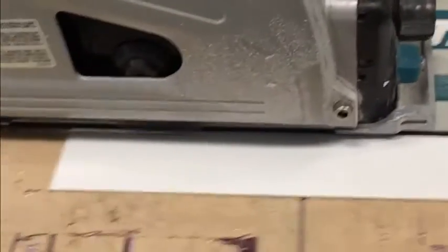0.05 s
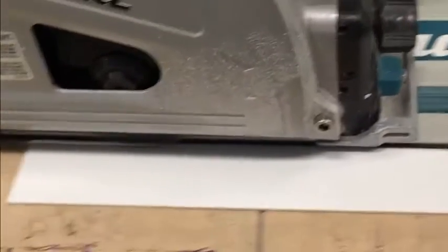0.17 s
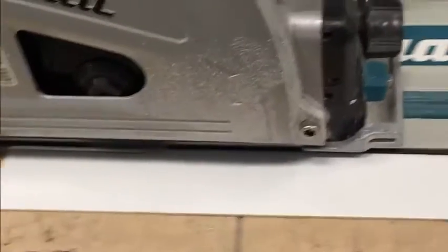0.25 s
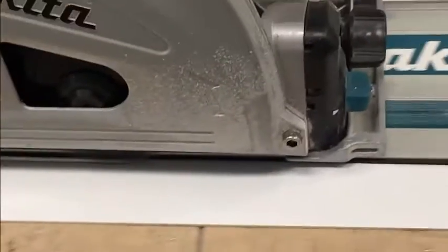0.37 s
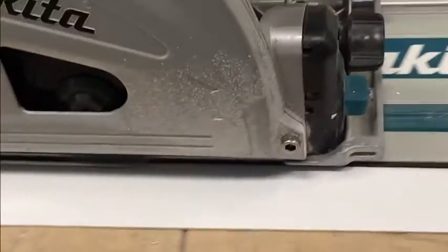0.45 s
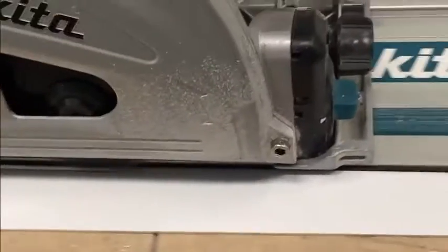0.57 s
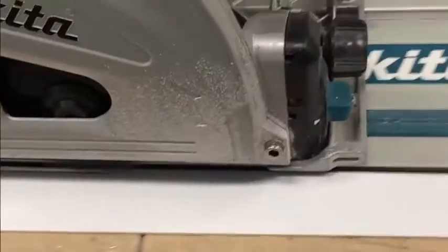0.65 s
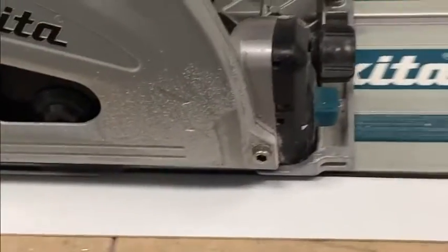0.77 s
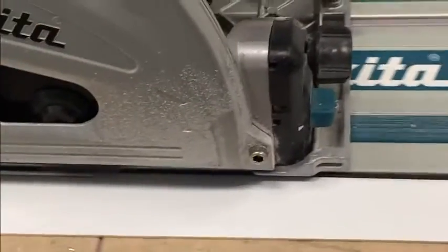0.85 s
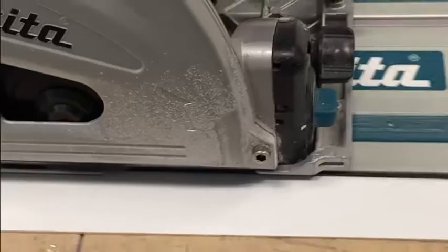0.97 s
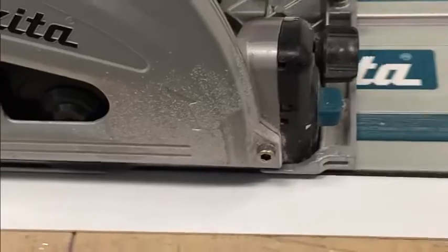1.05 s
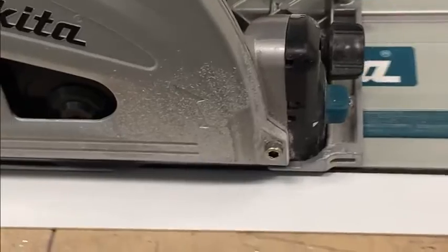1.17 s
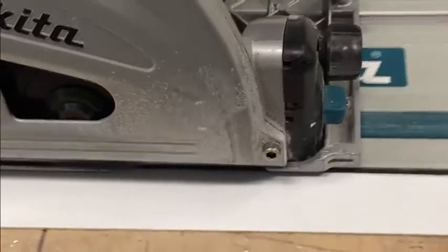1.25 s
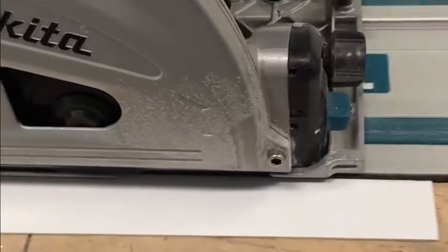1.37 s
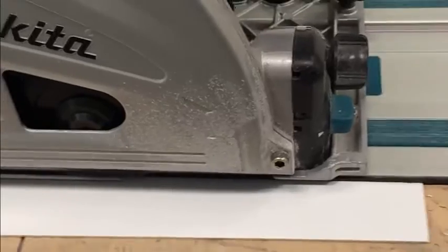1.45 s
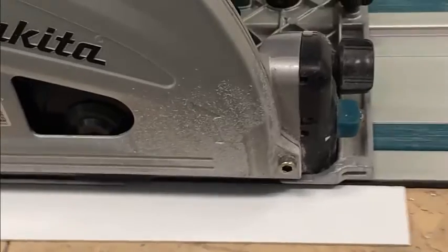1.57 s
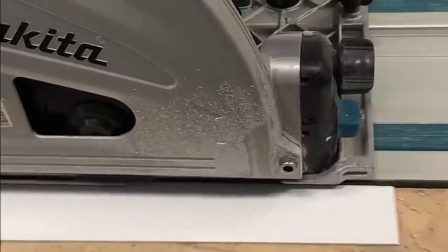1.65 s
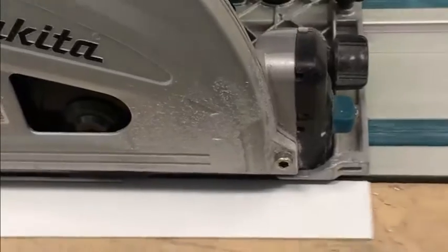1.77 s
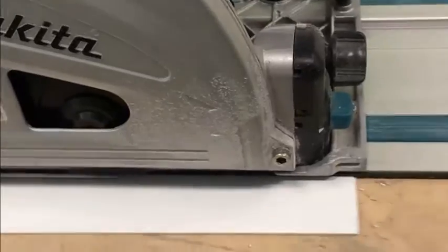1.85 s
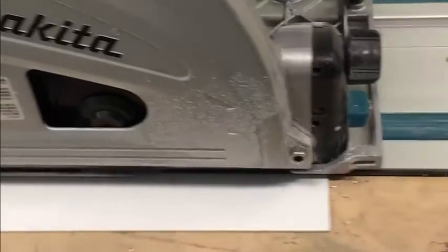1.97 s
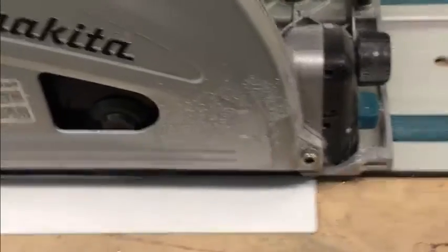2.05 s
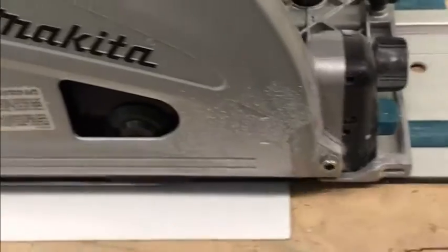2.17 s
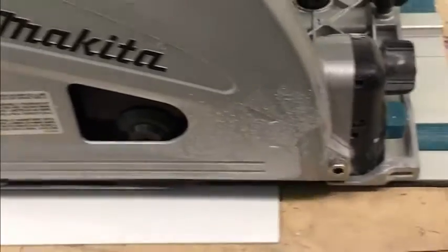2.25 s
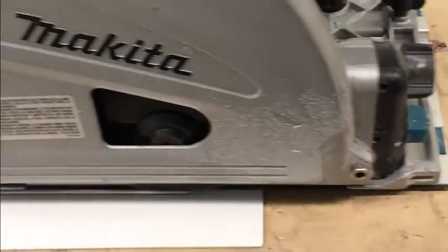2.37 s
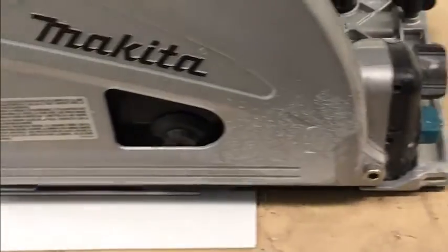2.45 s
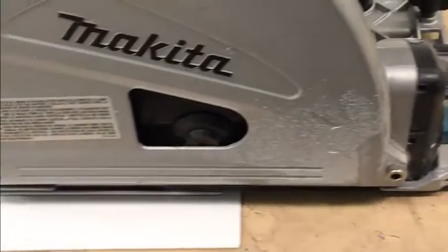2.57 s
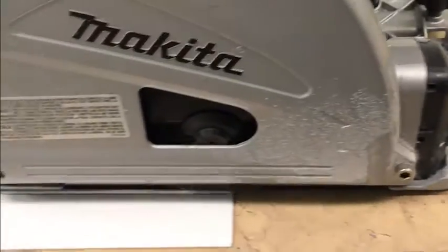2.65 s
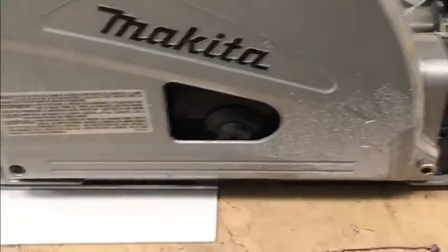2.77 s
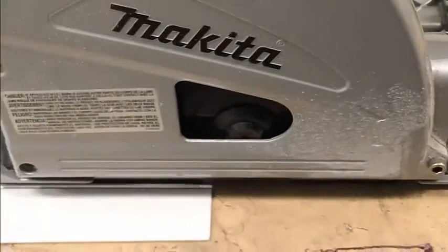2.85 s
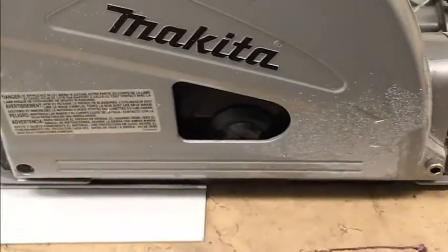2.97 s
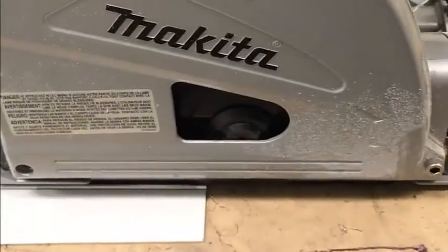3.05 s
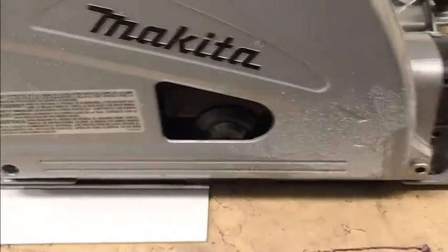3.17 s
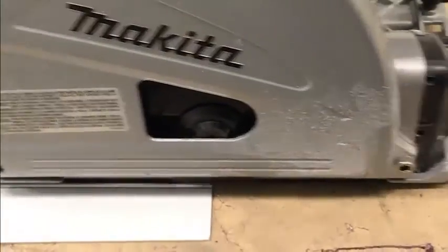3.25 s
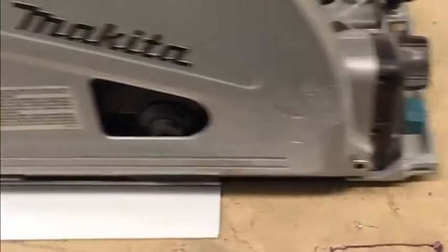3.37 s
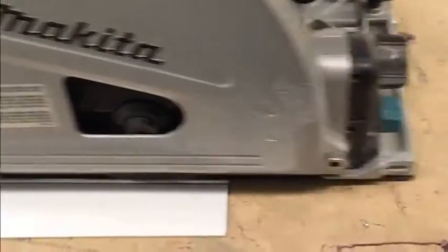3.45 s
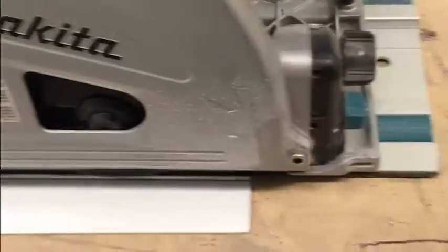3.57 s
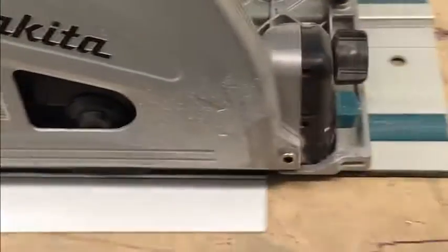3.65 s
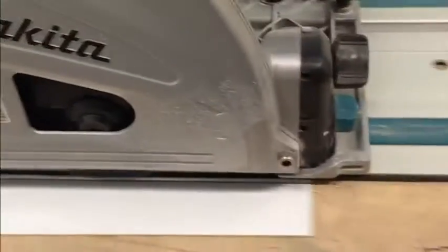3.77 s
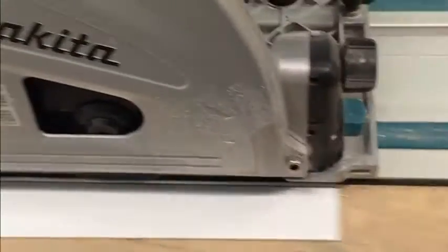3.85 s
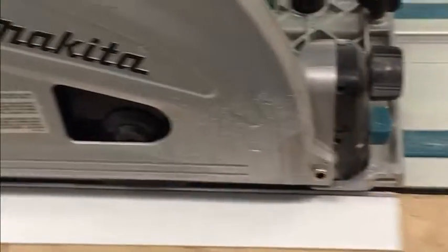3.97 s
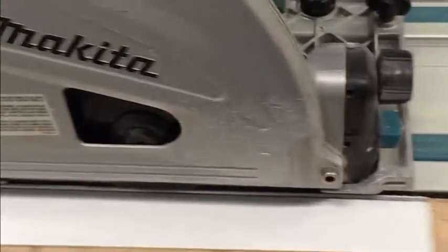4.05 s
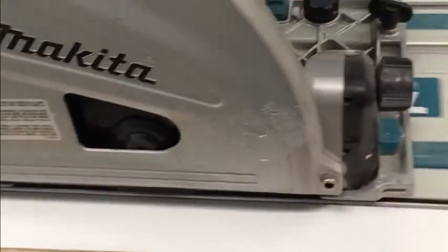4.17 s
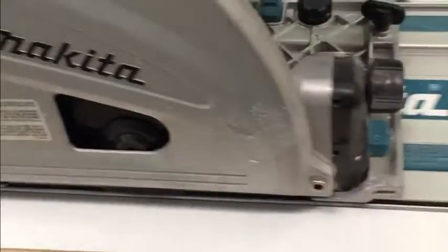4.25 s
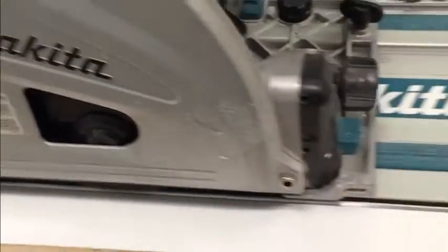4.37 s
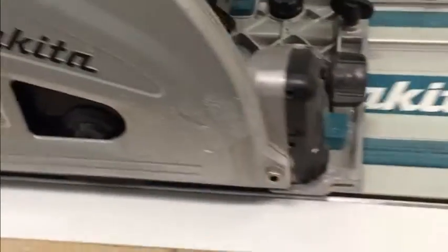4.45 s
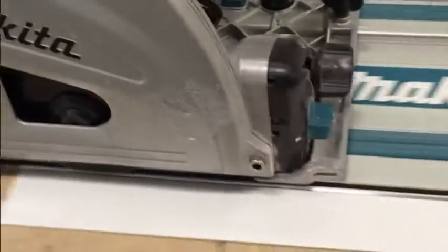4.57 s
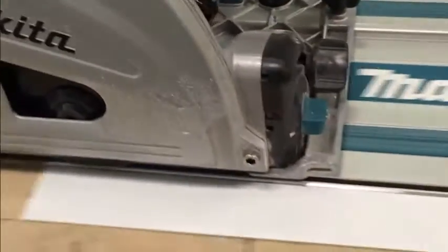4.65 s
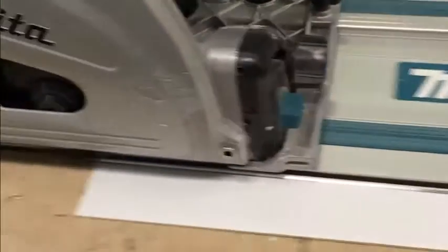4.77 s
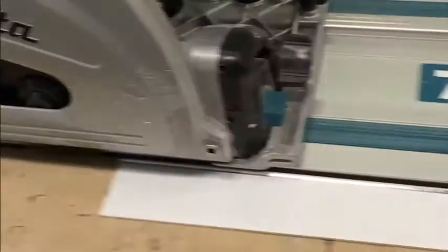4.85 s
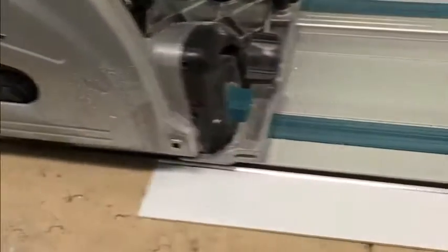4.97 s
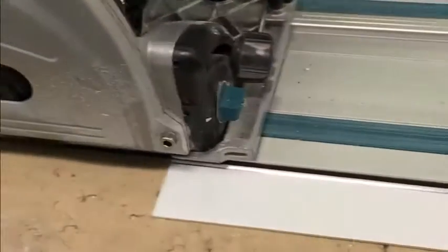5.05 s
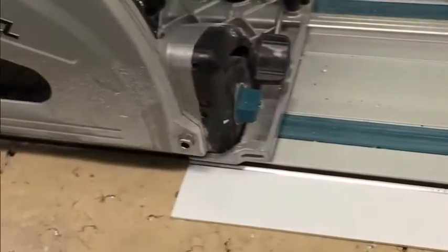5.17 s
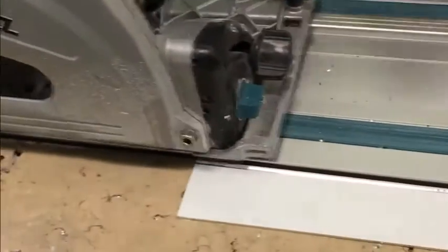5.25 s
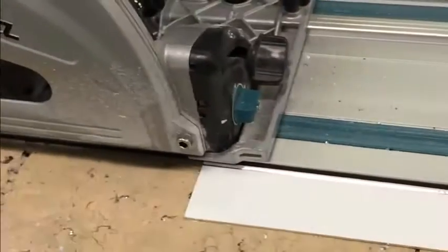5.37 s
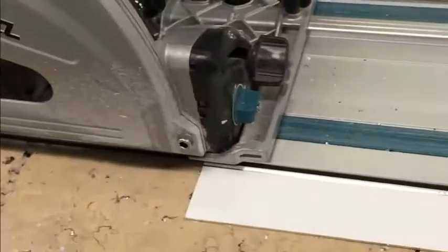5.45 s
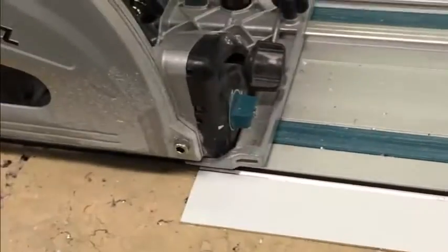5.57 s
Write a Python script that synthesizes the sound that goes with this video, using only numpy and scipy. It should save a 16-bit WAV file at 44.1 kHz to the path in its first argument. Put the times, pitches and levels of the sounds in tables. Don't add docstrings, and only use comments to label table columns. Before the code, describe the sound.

From the start a track saw is already cutting thin aluminium, very close: a loud, coarse buzz at about 88 pulses a second, with metallic ringing mostly around 1 to 2 kHz and gritty chip rasp. Its colour and pressure waver as it travels. Underneath lie a broad fan roar, a thin high motor whine and low table rumble. At about 2.7 s the cut ends abruptly, leaving roar and faint blade rubbing. From 3.3 to 3.8 s a long return stroke buzzes again, with a thin tooth-rate singing; shorter, quieter, scrapier jerks follow at 4.1, 4.4 and 4.55 s, ending near 4.8 s. At about 5.1 s the trigger is released and the whine glides down while air noise continues. A knock at 5.24 s leads into a strong double clack at 5.28 s, then faint rattles and a small double lever knock at 5.6 s. The workshop reverberation is short.

```python
import sys
import numpy as np
from scipy import signal
from scipy.io import wavfile
from scipy.ndimage import uniform_filter1d

SR = 44100
rng = np.random.default_rng(int(sys.argv[2]) if len(sys.argv) > 2 else 0)


def makeup_ratio(level_db):
    decades = np.asarray(level_db, float) / 20
    return 10 ** decades


def file_out(sig):
    cols = np.atleast_2d(sig).T
    lim = np.clip(cols, -1, 1)
    pcm = np.round(lim * 32767).astype(np.int16)
    wavfile.write(sys.argv[1], SR, pcm)


N = 247842
TIME = np.arange(N) / SR
RELEASE_S = 5.08
BACK_FROM_S, BACK_TO_S = 3.3, 4.82
GEARING = 4.877


def evened(x):
    return x / np.sqrt(np.mean(x ** 2) + 1e-20)


def eased(condition, samples):
    return uniform_filter1d(1. * condition, size=samples)


def curves(rows):
    s, *columns = np.transpose(rows)
    return [np.interp(TIME, s, c) for c in columns]


def wander(hz):
    t = TIME[::64]
    x = sum(np.sin(2 * np.pi * (f * t + rng.random())) / np.sqrt(f) for f in np.geomspace(hz / 10, hz, num=12))
    return np.interp(TIME, t, evened(x))


def highpass(x, hz):
    return signal.sosfilt(signal.butter(1, hz, "high", fs=SR, output="sos"), x)


# start_s, speed_turns_per_s
SPEED = [(0, 88.4), (.4, 88.7), (1.85, 88.7), (1.95, 88.45), (2.75, 88.4), (3.3, 88.8), (5.07, 88.9)]


def blade_speed():
    coasting_s = np.maximum(TIME - RELEASE_S, 0)
    return curves(SPEED)[0] - 40.5 * coasting_s + 2.5 * coasting_s ** 2


# start_s, end_s, let_go_s, level_db, blade_plate_db
STROKES = [
    (-.1, 2.722, .045, -11.7, -11),
    (3.265, 3.81, .15, -12, -8),
    (4.08, 4.3, .07, -17.5, -1.5),
    (4.36, 4.49, .04, -17.5, -4.5),
    (4.535, 4.765, .028, -16, -3.5),
]
# start_s, level_db
RUB = [(2.8, -29), (3.25, -25.5), (4., -23), (4.8, -23.5), (5., -31), (5.2, -38)]
# start_s, level_db
FEED = [(0, 2.5), (.25, -2.5), (.42, -0.4), (.6, -3.5), (.8, -0.5), (1.25, -1), (1.65, -0.2), (1.79, -2),
        (1.9, 1.), (2.55, 0.4), (2.7, 1.5), (3.3, -2.7), (3.45, 1.2), (3.8, -0.9), (4.1, 0.7)]


def strokes():
    rise_s, rub_plate_only_db, groove_plate_db = 0.053, -7, 4.5
    plate_feed = 0.33
    (rub_db,), (feed_db,) = curves(RUB), curves(FEED)
    in_groove = eased((TIME > BACK_FROM_S) & (TIME < BACK_TO_S), 1500)
    rub_plate_db = rub_plate_only_db + groove_plate_db * in_groove
    level_db, plate_db = rub_db, rub_plate_db
    for start, end, let_go, db, plate in STROKES:
        contact = np.clip(np.minimum((TIME - start) / rise_s, 1 + (end - TIME) / let_go), 0, 1)
        level_db = level_db + contact * (db + feed_db - rub_db)
        plate_db = plate_db + contact * (plate - plate_feed * feed_db - rub_plate_db)
    return level_db, plate_db


def teeth(turns, bite):
    strikes = np.zeros(N)
    for lag_turns, db in [(0, 0), (.17, -9), (.29, -14), (.5, -18)]:
        place = turns - lag_turns - 0.016 * wander(hz=1.5) * (lag_turns > 0)
        near = (place + .5) % 1 - .5
        sizes = makeup_ratio(db + .7 * rng.standard_normal(600))
        size = sizes[np.floor(place + 1.5).astype(int)]
        strikes += size * np.exp(-(near / .0018) ** 2)
    chips = (.5 + 0.62 * np.exp(-(turns % 1) / 0.9)) * rng.standard_normal(N)
    return np.sqrt(bite) * evened(strikes - strikes.mean()) + np.sqrt(1 - bite) * evened(chips)


def ring(force, modes, drift_db, late_s, centre_hz=None, reach_hz=200):
    out = np.zeros(N)
    for k, (hz, width, db) in enumerate(modes):
        r = np.exp(-np.pi * width / SR)
        mode = signal.lfilter([1 - r], [1, -r * np.exp(2j * np.pi * hz / SR)], force)
        lag = .8 * k + .05 * k ** 2 + rng.uniform(0, .6)
        off = 0 if centre_hz is None else np.minimum(((hz - centre_hz) / reach_hz) ** 2, 1.6)
        gain = makeup_ratio(db - 6 * off + drift_db * wander(hz=2.5))
        out += gain * (mode * np.exp(-1j * lag)).real
    out = np.roll(out, int(late_s * SR))
    return out / np.sqrt(uniform_filter1d(out ** 2, size=8000) + 1e-12)


def grit(turns):
    swell = 2.3 + np.exp(-((turns - .03) % 1) / 1.3)
    band = signal.butter(2, [2700, 5600], "band", fs=SR, output="sos")
    return evened(swell * signal.sosfilt(band, rng.standard_normal(N)))


def groove_brush(turns):
    brushing = eased((TIME > BACK_FROM_S) & (TIME < BACK_TO_S), 2000)
    gain = np.sqrt(2) * makeup_ratio(-31.5 + 1.5 * wander(hz=14)) * brushing
    return gain * np.cos(2 * np.pi * 48 * turns)


# pitch_hz, width_hz, level_db
BOTTOM_PATCH = [(91, 44, -25), (185, 26, 2.5), (357, 56, 1), (421, 25, 4), (535, 71, 1.5), (600, 53, -1.5),
                (706, 35, 2.5), (844, 76, 9.5), (886, 52, 2)]
LOW_PATCH = [(944, 110, 1.5), (1056.7, 39, 4.5), (1148, 25.5, 4), (1243, 47, -0.5)]
MIDDLE_PATCH = [(1240, 21, -8.5), (1434, 34, 6), (1562, 47, -5), (1630, 67, 1), (1708, 25, 3),
                (1760, 84, -2.5), (1884, 38, 0.5)]
HIGH_PATCH = [(1945, 69, -3.5), (2044, 24, 3.5), (2153, 100, -10), (2199, 59, 1.5), (2420, 28, -5.5),
              (2770, 110, -19)]
PLATE = [(2490, 60, 0), (2660, 70, 0), (3020, 80, -2), (3190, 70, -3), (3280, 80, -3), (3520, 110, -3),
         (3720, 110, -3), (4080, 80, -2), (4450, 100, -2), (4700, 50, -2), (4790, 60, 0), (5290, 120, -4),
         (5800, 300, -8), (7200, 300, -10), (8520, 150, -11)]
SPOT_HZ = 770, 1128, 1525, 2050
# start_s, high_over_low_db, upper_patch_slide_hz, lower_patch_slide_hz
SPAN = [(0, -5, -60, 10), (.2, 5, 90, -20), (.4, -3, 70, -17), (.55, -4, -68, -82), (.8, -6, -40, -52),
        (1.1, -6, 63, 15), (1.33, -4.5, -58, 55), (1.7, 0, -150, 60), (1.92, 3.5, -30, 37),
        (2.05, 3.5, 0, -6), (2.4, 1, -42, 48), (2.6, -4, 24, 29), (2.75, 3, 74, 0), (3.35, 0.5, 73, -30),
        (3.8, 7, 40, -31), (4.08, -2, -94, -30), (4.4, -4.5, 75, -28), (4.75, 3.5, 20, 86)]


def cut(speed, turns):
    (level_db, plate_db), (tilt_db, upper_hz, lower_hz) = strokes(), curves(SPAN)
    back = eased(TIME > BACK_FROM_S, 4000)
    bite = np.clip(0.1 * (uniform_filter1d(level_db, size=2000) + 25), .02, .8)
    bite *= np.where(TIME > STROKES[2][0], .72, 1)
    force = highpass(teeth(turns, bite), 300)

    low_share = 0.36
    low_db = -4.5 - low_share * tilt_db - 2.5 * back
    high_db = -5 + (1 - low_share) * tilt_db - 1.4 * back
    high_db -= 5 * (1 - bite) ** 4
    plate_db = plate_db - 0.2 * tilt_db * (1 - back)
    level_db = level_db - 0.088 * np.maximum(84 - speed, 0)
    low, high = makeup_ratio(low_db), makeup_ratio(high_db)
    rest = np.sqrt(np.clip(1 - low ** 2 - high ** 2, .08, 1))
    bottom = (0.15 + 0.16 * rest) * makeup_ratio(0.039 * np.maximum(lower_hz, 0))

    bottom_hz, low_hz = SPOT_HZ[0] + 1.07 * lower_hz, SPOT_HZ[1] + lower_hz
    middle_hz, high_hz = SPOT_HZ[2] + upper_hz, SPOT_HZ[3] + 1.3 * upper_hz
    sheet = rest * .85 * ring(force, MIDDLE_PATCH, 2.0, late_s=.0008, centre_hz=middle_hz, reach_hz=240)
    sheet += bottom * ring(force, BOTTOM_PATCH, 0.5, late_s=.00047, centre_hz=bottom_hz, reach_hz=139)
    sheet += low * ring(force, LOW_PATCH, 2.1, late_s=.0004, centre_hz=low_hz, reach_hz=160)
    sheet += high * ring(force, HIGH_PATCH, 1.9, late_s=.0002, centre_hz=high_hz, reach_hz=200)
    plate = .9 * ring(force, PLATE, drift_db=4.0, late_s=0) + .44 * grit(turns)
    sheet += makeup_ratio(plate_db - 1.5) * plate
    return makeup_ratio(level_db - 0.1) * sheet + groove_brush(turns)


def hiss(points, patchy_db):
    frames, hz = N // 256 + 5, np.fft.rfftfreq(1024, 1 / SR)
    a, b, patches = rng.standard_normal((frames, 513, 3)).T
    patches = uniform_filter1d(uniform_filter1d(patches, size=12, axis=0), size=16, axis=1)
    f, level = np.transpose(points)
    db = np.interp(np.log(hz + 1), np.log(f + 1), level)[:, None] + patchy_db * evened(patches)
    return signal.istft((a + 1j * b) * makeup_ratio(db), nperseg=1024, noverlap=768)[1][:N]


# pitch_hz, level_db_per_hz
FAN = [(30, -50), (85, -13.5), (300, -15.5), (450, -1), (750, -5.5), (1500, -1), (2200, -3.5), (2600, -7),
       (3400, -8.5), (4200, -13.5), (5700, -14.5), (7500, -10), (9500, -12), (11200, -12.5)]
# start_s, level_db
AIR = [(0, -27.5), (1.85, -26.5), (2.14, -33.5), (2.4, -27), (2.56, -34), (2.73, -24), (2.81, -31.5),
       (2.98, -28.5), (3.07, -23.7), (3.45, -26), (4.04, -29), (4.7, -25), (4.86, -28), (5., -24),
       (5.2, -26.3), (5.48, -28.5), (5.62, -26)]


def fan_roar(turns):
    fan = hiss(FAN, patchy_db=2.3)
    fan *= 1 + 0.079 * np.cos(2 * np.pi * (turns - .15))
    band = signal.butter(4, [5730, 10850], "band", fs=SR, output="sos")
    return makeup_ratio(curves(AIR)[0] - 1.3) * fan / np.std(signal.sosfilt(band, fan))


def resonate(x, hz, width):
    turn = np.exp(2j * np.pi * np.cumsum(hz * np.ones(len(x))) / SR)
    r = np.exp(-np.pi * width / SR)
    return 2 * (turn * signal.lfilter([1 - r], [1, -r], x / turn)).real


# motor_order, level_db, width_hz
WHINE = [(16, -48, 18), (22, -47, 18), (23, -44, 18), (24, -42, 22), (25, -47, 18)]
# pitch_hz, width_hz, level_db
CASING = [(9830, 300, 11), (8380, 500, 17)]


def armature(speed, turns, lost):
    hum_db = -38.5 - 0.5 * eased(TIME > STROKES[0][1], 16000) - 0.6 * lost
    hum_db += 9.5 * np.exp(-((TIME - RELEASE_S) / 0.22) ** 2)
    out = np.sqrt(2) * makeup_ratio(hum_db) * np.cos(2 * np.pi * GEARING * turns)
    brush_hz = 24 * GEARING * speed
    casing_db = sum(db * np.exp(-((brush_hz - hz) / width) ** 2) for hz, width, db in CASING)
    for order, db, width in WHINE:
        line = evened(resonate(rng.standard_normal(N), order * GEARING * speed, width))
        out += makeup_ratio(db + casing_db * (order == 24)) * line
    return out


# pitch_hz, level_db_per_hz
RUMBLE = [(12, -60), (20, -32), (80, -20), (141, -12), (173, -3.5), (236, -21.5), (353, -6), (400, -34),
          (520, -45), (880, -120)]


def table_rumble(lost):
    air_db, = curves(AIR)
    db = -32 + 0.5 * wander(hz=3.6) - 5.5 * lost + 0.45 * (air_db - air_db.mean())
    return makeup_ratio(db - 7.5) * evened(hiss(RUMBLE, patchy_db=2.0))


def motor(speed, turns):
    lost = np.maximum(SPEED[-1][1] - speed, 0)
    return fan_roar(turns) + armature(speed, turns, lost) + table_rumble(lost)


# start_s, peak_db, pitch_hz, t60_s
CLACKS = [
    (5.235, -5, 1745, 0.02),
    (5.275, 2.5, 1434, 0.02),
    (5.283, -1.5, 1310, 0.019),
    (5.318, -10, 1460, 0.049),
    (5.399, -10.5, 1320, 0.038),
    (5.606, -9, 1525, 0.093),
    (5.611, -7, 1514, 0.11),
]
# pitch_factor, level_db
CLACK_BODY = [(.5, -10), (.82, -16), (1., 6), (1.2, 2.5), (2.1, -9), (2.8, -12), (4.9, -2)]


def clacks():
    out, t = np.zeros(N + 8000), np.arange(8000) / SR
    for s, db, hz, t60 in CLACKS:
        knock = sum(makeup_ratio(d - 60 * t * np.sqrt(k) / t60) * np.sin(2 * np.pi * hz * k * t) for k, d in CLACK_BODY)
        rattle = uniform_filter1d(rng.standard_normal(8000), size=6) * makeup_ratio(-60 * t / (0.95 * t60))
        knock = (knock + 0.97 * rattle) * (1 - np.exp(-t / 0.00032))
        out[round(s * SR):][:8000] += makeup_ratio(db) * knock / abs(knock).max()
    return out[:N]


def room(x):
    t = np.arange(9000) / SR
    taps = rng.choice([-1., 1.], 9000) * (rng.random(9000) < .05)
    taps *= makeup_ratio(-60 * t / 0.076) * (t > .004)
    return signal.fftconvolve(x, taps / np.linalg.norm(taps))[:N]


def scene():
    speed = blade_speed()
    turns = np.cumsum(speed) / SR + .15
    near = cut(speed, turns) + clacks()
    return (near + makeup_ratio(-8.5) * room(near) + motor(speed, turns))[None]


def top_cut(x):
    return signal.sosfilt(signal.butter(12, 12150, fs=SR, output="sos"), x)


def record(dry):
    knee, span = .65, .38
    limited = np.sign(dry) * (knee + span * np.tanh((abs(dry) - knee) / span))
    x = highpass(np.where(abs(dry) > knee, limited, dry), 60)
    hz, _, z = signal.stft(x[0], SR, nperseg=1024, noverlap=768)
    hz = hz[:, None]
    patch = uniform_filter1d(uniform_filter1d(abs(z) ** 2, size=3, axis=0), size=8, axis=1)
    around = uniform_filter1d(uniform_filter1d(patch, size=10, axis=0), size=12, axis=1)
    weak = (patch < .42 * around) & (hz > 2800)
    z *= np.where(weak, .25, 1) * (hz < 10930)
    x = signal.istft(z, SR, nperseg=1024, noverlap=768)[1][None, :N]
    mix = np.clip(x, -1, 1)
    return top_cut(mix)


dry = scene()
out = record(dry)
file_out(out)
```